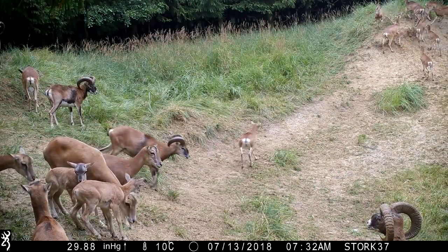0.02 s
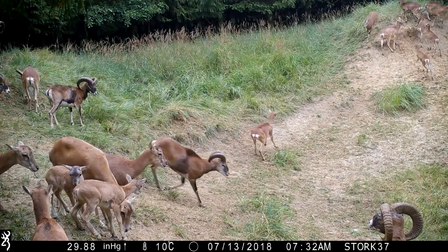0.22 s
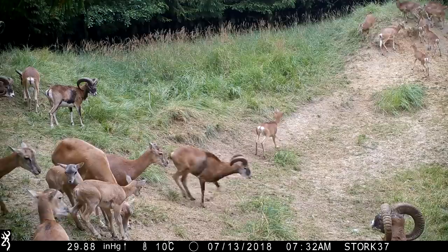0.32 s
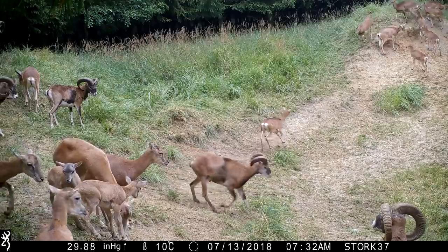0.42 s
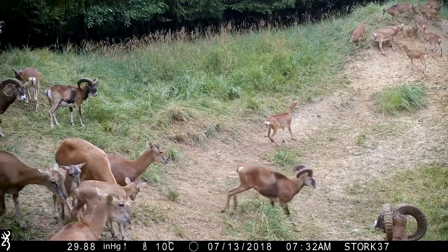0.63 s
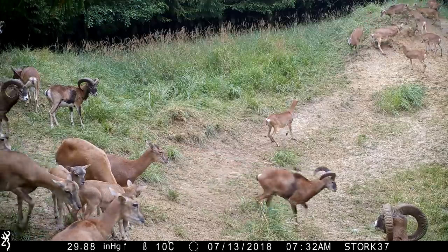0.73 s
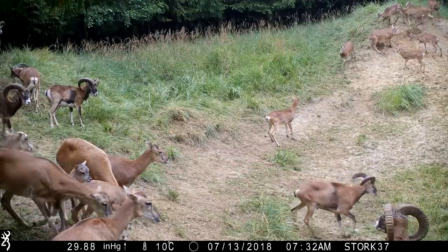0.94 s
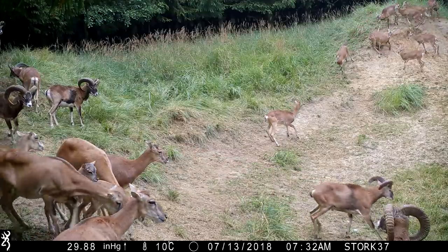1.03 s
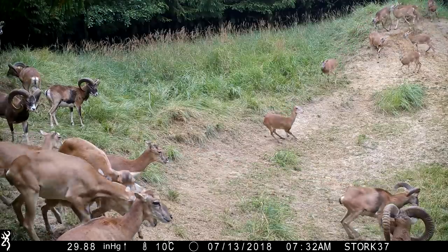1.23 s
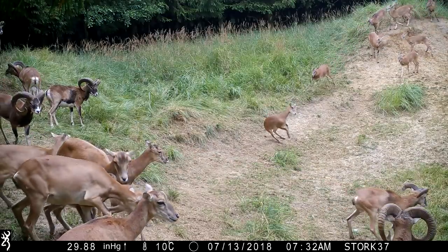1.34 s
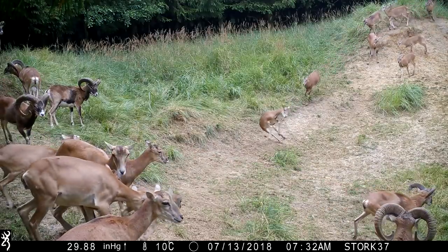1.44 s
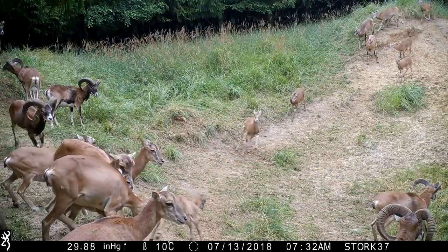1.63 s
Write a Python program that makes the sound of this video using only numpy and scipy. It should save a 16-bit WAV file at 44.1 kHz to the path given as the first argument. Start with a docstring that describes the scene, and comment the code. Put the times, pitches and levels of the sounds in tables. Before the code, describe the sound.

A single sheep bleats near a small outdoor microphone, nasal and trembling, quiet then suddenly blaring; it stops short, leaving a faint echo off slope and trees, scattered hoof thuds, knocks and scuffs, and low hiss.

```python
"""Wild sheep bleat with hooves

One close bleat: pulses ring the nose in a quavering hum, then also the mouth, which opens on six loud beats.
Hooves of the herd thud, knock and scuff dry ground, built from decaying resonances and noise bursts.
The ground returns one bounce; slope and trees answer faintly with decaying noise scatter.
Below lie the hiss and low rumble of a small outdoor camera with a narrow band, made of shaped noise.
"""
import sys
import numpy as np
from scipy import signal
from scipy.fft import rfft, irfft, next_fast_len
from scipy.io import wavfile

SR = 44100
rng = np.random.default_rng(int(sys.argv[2]) if len(sys.argv) > 2 else 0)


def dump_mix(stems):
    """Bounce the given channels to the path in sys.argv[1] as a 16-bit WAV at rate SR."""
    frames = np.atleast_2d(stems).T  # one column per channel
    limited = np.clip(frames, -1, 1)  # hard clip at full scale
    pcm = np.round(limited * 32767).astype(np.int16)
    wavfile.write(sys.argv[1], SR, pcm)


N = 74970
T = np.arange(N) / SR

# Beats of the quaver: start_s, level_db, start_dip_db, crest_pitch_hz, start_sag_hz, blare_hz, blare_db
QUAVER_BEATS = [(-0.015, -12.5, 0, 156.6, 6.5, 2850, -5), (0.054, -12.5, 17, 165.2, 11.5, 2400, 0),
                (0.125, -11.5, 16, 158.5, 8, 2800, 5), (0.194, -1, 15.5, 180.7, 11.8, 2736, -0.5),
                (0.257, -1.2, 22, 186.1, 12.5, 2738, 10.5), (0.315, .5, 11.5, 195.5, 26, 2900, 10),
                (0.377, 1.5, 9.5, 202, 21, 2815, 4.5), (0.44, .5, 9, 198.6, 13, 2780, 2),
                (0.501, 0, 14, 193.6, 20, 2800, 0)]
# Mouth resonances: just_open_hz, half_hz, wide_hz, just_open_db, half_db, wide_db, ring_s, swell_s
MOUTH_RESONANCES = [(916, 790, 780, -13.5, -24, -15.5, 0.0019, 0.00026),
                    (1050, 1180, 1255, -19.5, -18, -16.5, 0.0023, 0.00022),
                    (1420, 1300, 1570, -30.5, -23, -14.5, .0012, 0.0002),
                    (1980, 1965, 1906, -11.5, -7, -5, 0.0029, 0.00072),
                    (2340, 2590, 2568, -8, -11, -6.5, 0.0012, 0.00078),
                    (3059, 3170, 3203, 2, 1, .5, .0018, 0.0016),
                    (3210, 3354, 3507, -18, -11, -11, 0.0016, 0.001)]
# Nose resonances: freq_hz, mouth_shut_db, just_open_db, wide_db, ring_s, swell_s
NOSE_RESONANCES = [(182, -19, -25.5, -18.5, 0.0032, 0.00065), (326, -17.5, -29.5, -23.5, 0.0024, 0.00033),
                   (579, -19, -27, -21.5, 0.0029, 0.00027), (1060, -18, -32.5, -35.5, .002, .0003)]
# Hoof falls: start_s, thud_hz, thud_db, knock_db, grit_db, scuff_s
HOOF_FALLS = [(0.574, 273, -24.5, -36, -49, 0.011), (0.578, 133, -22, -34, -46, .01),
              (0.904, 215.7, -29, -61, -41, .02), (0.963, 241, -31, -19, -35, 0.0065),
              (0.972, 241.5, -21, -24, -25.5, 0.0068), (0.985, 104, -24.5, -46, -36, 0.013),
              (1.0313, 214, -30, -10.5, -31.5, 0.019), (1.167, 148, -32, -46, -47, .015),
              (1.443, 131, -44, -48, -38, .005), (1.555, 249, -42, -41, -36.5, 0.015),
              (1.658, 273, -42, -40, -38, .03)]
# Hoof on hard soil: freq_hz, level_db, ring_s
KNOCK_RESONANCES = [(318, -10.5, 0.0039), (660, 2.5, 0.0014), (1150, -3, .0007)]
# Spectrum of scuffed grit: freq_hz, level_db
GRIT_SPECTRUM = [(100, -15), (400, 2), (1400, -2), (2300, -6.5), (3500, 2.5), (4400, -16), (5500, -55)]
# Spectrum of the hiss: freq_hz, density_db
HISS_SPECTRUM = [(20, -7.5), (80, 1), (150, -1.5), (280, -5), (500, -10), (1000, -14.5), (2000, -15),
                 (3600, -13.5), (4300, -29.5), (5500, -77)]
# Spectrum of the scatter: freq_hz, level_db
ECHO_SPECTRUM = [(100, -17.5), (500, -4), (1200, -2.5), (1950, -5), (2300, 0), (2850, 2.5), (3400, -5),
                 (4000, -7), (5000, -46)]
# Spectrum of the rasp: freq_hz, level_db
RASP_SPECTRUM = [(20, -0.5), (400, -1.5), (1200, -28.5)]

OPEN_S, OPEN_TAKES_S, HALF_S, WIDE_S = 0.2068, 0.004, 0.44, 0.52  # mouth parts, is half open, is wide
END_S, END_SAG_HZ, END_DIP_DB, RELEASE_S = 0.567, 36.4, 17, 0.0058
BEAT_SKEW, LEVEL_ARCH_POWER = 1.05, 1.32  # skew > 1: arch peaks a little late
JITTER_S, SHIMMER_DB, SCATTER_RATIO = 0.00003, 0.5, 0.013  # standard deviations per pulse
RASP_RATIO = 0.21  # noise share of a ring
BLARE_RING_S, BLARE_SWELL_S, BLARE_SHUT_DB = 0.0014, 0.0018, -7.5
THUD_RING_S, THUD_SWELL_S, KNOCK_SWELL_S, GRIT_RISE_S = 0.012, 0.003, 0.00052, 0.00039
GROUND_DELAY_S, GROUND_DB = 0.002122, -12.5
NEAR_DB, NEAR_T60_S = -19.5, 0.13
ECHO_DB, ECHO_T60_S, ECHO_DELAY_S = -22, 0.88, 0.0088
HISS_DB, WAVER_DB, WAVER_HZ = -40.5, 1.1, 12
RUMBLE_HZ, RUMBLE_WIDTH_HZ, RUMBLE_DB = 57.3, 7, -46
BAND_HZ, TOP_HZ, FULL_SCALE = 4330, 16500, 1.0


def amp(db):
    """Decibels to gain."""
    return 10 ** (np.asarray(db) / 20)


def unit(x):
    """Scale to rms 1."""
    return x / np.sqrt(np.mean(x ** 2) + 1e-20)


def filtered(x, gain):
    """Apply a frequency-dependent gain(hz)."""
    size = next_fast_len(len(x) + 8192)
    spectrum = rfft(x, size) * gain(np.fft.rfftfreq(size, 1 / SR))
    return irfft(spectrum, size)[:len(x)]


def noise(points):
    """Noise of rms 1, spectrum interpolated in dB over log frequency."""
    freq_hz, level_db = np.transpose(points)

    def gain(hz):
        return amp(np.interp(np.log(hz + 1), np.log(freq_hz + 1), level_db))

    return unit(filtered(rng.standard_normal(N), gain))


def ring(t, hz, life_s, swell_s):
    """A resonance that swells and dies after a push at t = 0."""
    t = np.maximum(t, 0)
    swell = 1 - np.exp(-(t / swell_s) ** 2)
    return np.sin(2 * np.pi * hz * t) * np.exp(-t / life_s) * swell


def quaver():
    """Pitch and strength arch with every beat; the blare shifts from beat to beat."""
    start, level_db, dip_db, crest_hz, sag_hz, blare_hz, blare_db = np.transpose(QUAVER_BEATS)
    edges = np.append(start, END_S)
    mid = (edges[1:] + edges[:-1]) / 2
    phase = np.interp(T, edges, np.arange(len(edges))) % 1
    arch = np.abs(np.sin(np.pi * phase ** BEAT_SKEW))
    sag = np.interp(T, edges, np.append(sag_hz, END_SAG_HZ))
    dip = np.interp(T, edges, np.append(dip_db, END_DIP_DB))
    pitch_hz = np.interp(T, mid, crest_hz) - sag * (1 - arch)
    level = np.interp(T, mid, level_db) - dip * (1 - arch ** LEVEL_ARCH_POWER)
    strength = amp(level) * np.exp(-np.maximum(T - END_S, 0) / RELEASE_S)
    return pitch_hz, strength, np.interp(T, mid, blare_hz), np.interp(T, mid, blare_db)


def bleat():
    """Each closing of the vocal folds rings the nose, the blare and, once it opens, the mouth."""
    pitch_hz, strength, blare_hz, blare_db = quaver()
    cycles = np.cumsum(pitch_hz) / SR
    cycles -= np.interp(OPEN_S + OPEN_TAKES_S, T, cycles) % 1  # a pulse falls as the mouth finishes parting
    pulse_count = np.interp(END_S + RELEASE_S, T, cycles)
    at = np.interp(np.arange(pulse_count), cycles, T)[:, None]

    # rows: mouth resonances, blare, shimmer, jitter
    chance = rng.standard_normal((len(MOUTH_RESONANCES) + 3, len(at), 1))
    at = np.abs(at + JITTER_S * chance[-1])
    size = np.interp(at, T, strength) * amp(SHIMMER_DB * chance[-2])
    index = (at * SR).astype(int) + np.arange(SR // 40)  # 25 ms per pulse
    t = index / SR - at
    opened = np.clip((at - OPEN_S) / OPEN_TAKES_S, 0, 1)

    def rasp():
        return 1 + RASP_RATIO * noise(RASP_SPECTRUM)[index]

    # blare: strongest resonance, muffled by a shut mouth
    hz = np.interp(at, T, blare_hz) * (1 + SCATTER_RATIO * chance[-3])
    gain = amp(np.interp(at, T, blare_db) + BLARE_SHUT_DB * (1 - opened))
    pulses = -gain * rasp() * ring(t, hz, BLARE_RING_S, BLARE_SWELL_S)

    mouth_stages = [OPEN_S, HALF_S, WIDE_S]
    for k, row in enumerate(MOUTH_RESONANCES):
        hz = np.interp(at, mouth_stages, row[:3]) * (1 + SCATTER_RATIO * chance[k])
        gain = opened * amp(np.interp(at, mouth_stages, row[3:6]))
        sign = (-1) ** (k + (row[1] > blare_hz.max()))  # neighbouring resonances swing oppositely
        pulses += sign * gain * rasp() * ring(t, hz, *row[6:])

    nose_stages = [OPEN_S, OPEN_S + OPEN_TAKES_S, WIDE_S]
    for hz, *levels_db, life_s, swell_s in NOSE_RESONANCES:
        gain = amp(np.interp(at, nose_stages, levels_db))
        pulses -= gain * ring(t, hz, life_s, swell_s)

    return np.bincount(index.ravel(), (size * pulses).ravel(), N)[:N]  # overlap-add


def hooves():
    """Each hoof thuds on the soil, knocks and scuffs dry grit."""
    out = np.zeros(N)
    for start_s, thud_hz, thud_db, knock_db, grit_db, scuff_s in HOOF_FALLS:
        t = np.maximum(T - start_s, 0)
        out += amp(thud_db) * ring(t, thud_hz, THUD_RING_S, THUD_SWELL_S)
        for hz, level_db, life_s in KNOCK_RESONANCES:
            out += amp(knock_db + level_db) * ring(t, hz, life_s, KNOCK_SWELL_S)
        scuff = np.exp(-t / scuff_s) * (1 - np.exp(-t / GRIT_RISE_S))
        out += amp(grit_db) * noise(GRIT_SPECTRUM) * scuff
    return out


def ground_bounce(x):
    """One delayed, weaker copy off the ground."""
    return amp(GROUND_DB) * np.interp(T - GROUND_DELAY_S, T, x, left=0)


def echo(x, t60_s):
    """Diffuse scatter: noise tail of unit energy that falls 60 dB in t60_s."""
    tail = noise(ECHO_SPECTRUM) * amp(-60 * T / t60_s) * (T > ECHO_DELAY_S)
    return signal.fftconvolve(x, tail / np.linalg.norm(tail))[:N]


def hiss():
    """Steady shaped noise whose level wavers a little."""
    waver = unit(filtered(rng.standard_normal(N), lambda hz: np.exp(-(hz / WAVER_HZ) ** 2)))
    return amp(HISS_DB + WAVER_DB * waver) * noise(HISS_SPECTRUM)


def rumble():
    """Noise in a narrow low resonance."""
    def gain(hz):
        return 1 / (1 + ((hz - RUMBLE_HZ) / RUMBLE_WIDTH_HZ) ** 2)

    return amp(RUMBLE_DB) * unit(filtered(rng.standard_normal(N), gain))


def lowpass(x, edge_hz):
    """A steep cut above the edge."""
    return filtered(x, lambda hz: 1 / np.sqrt(1 + (hz / edge_hz) ** 80))


def scene():
    """Herd, ground bounce, scatter from slope and trees, background."""
    herd = bleat() + hooves()
    scatter = amp(NEAR_DB) * echo(herd, NEAR_T60_S) + amp(ECHO_DB) * echo(herd, ECHO_T60_S)
    return (herd + ground_bounce(herd) + scatter + hiss() + rumble())[None]


def record(dry):
    """Narrow band; peaks past full scale clip, which spreads a faint crackle above the band."""
    narrow = lowpass(dry[0], BAND_HZ)
    clipped = np.clip(narrow, -FULL_SCALE, FULL_SCALE)
    return lowpass(clipped, TOP_HZ)[None]


dry = scene()
out = record(dry)
dump_mix(out)
```